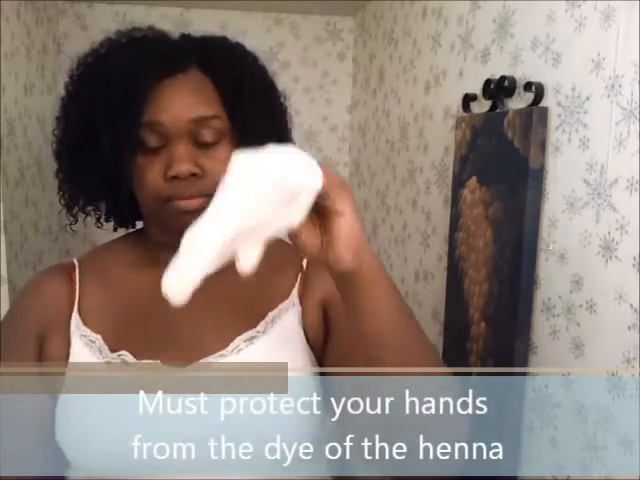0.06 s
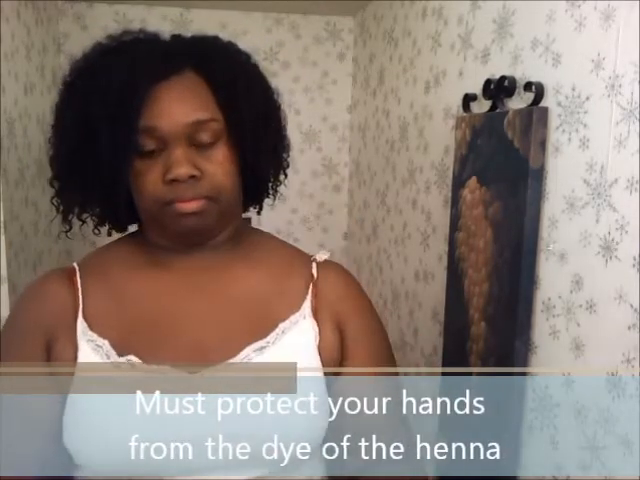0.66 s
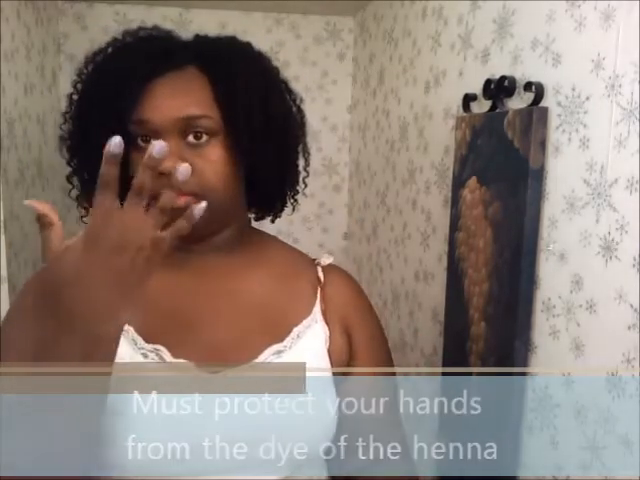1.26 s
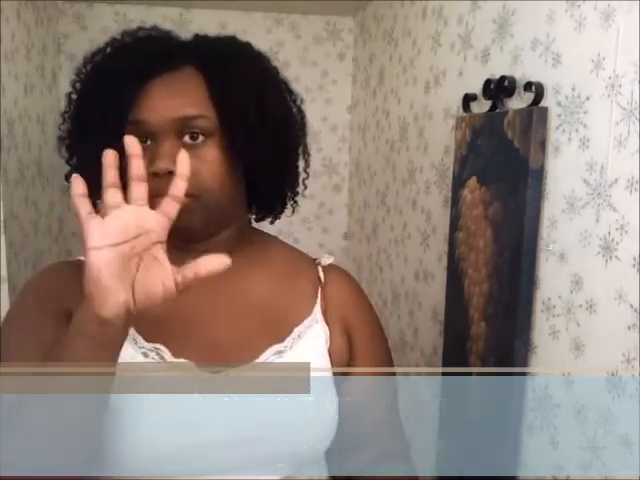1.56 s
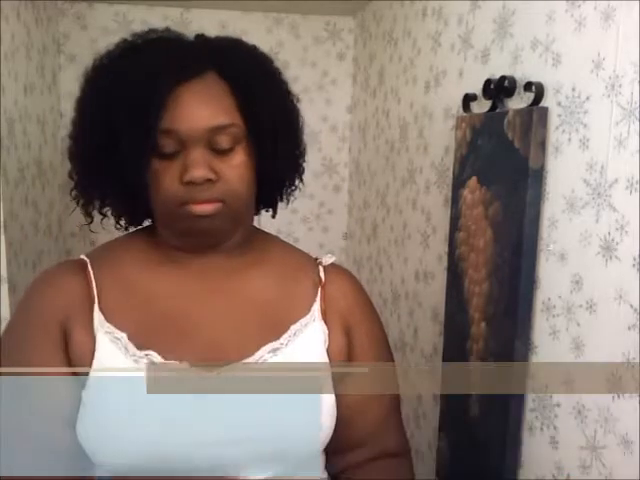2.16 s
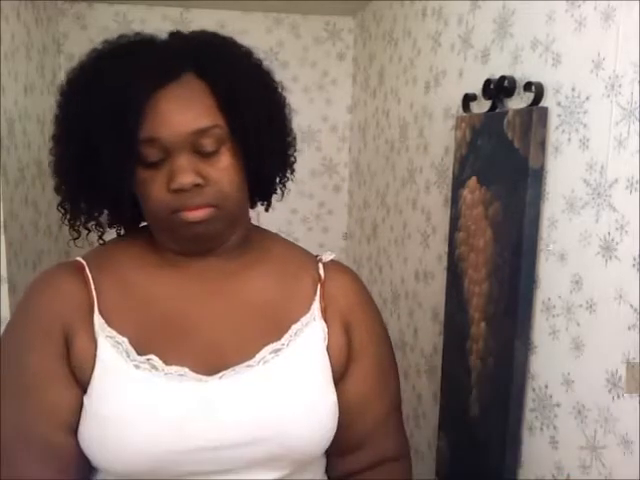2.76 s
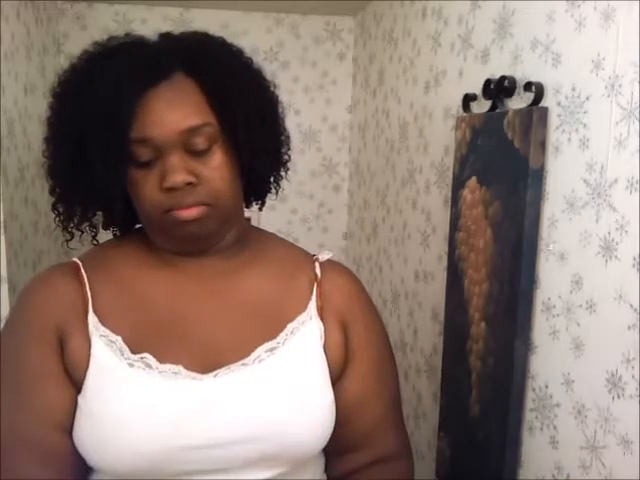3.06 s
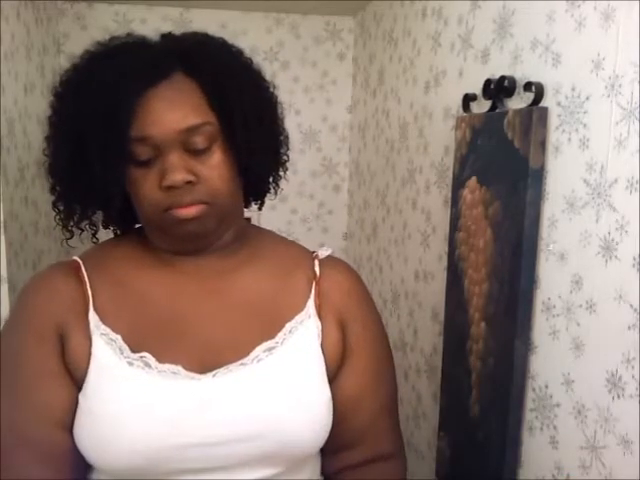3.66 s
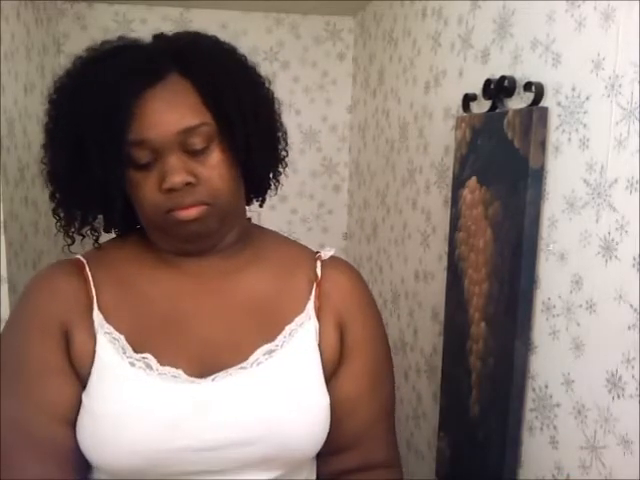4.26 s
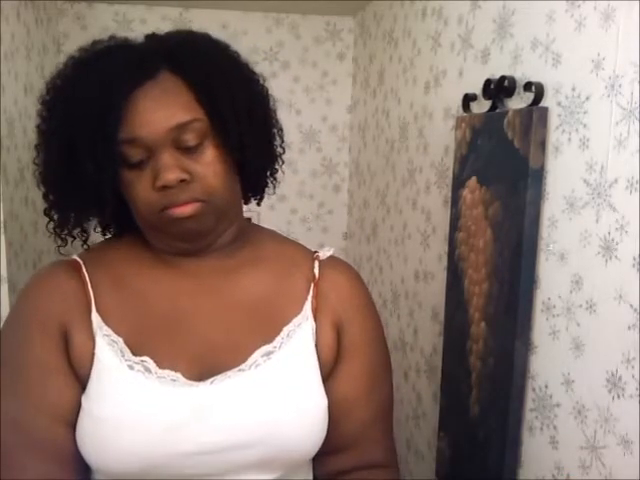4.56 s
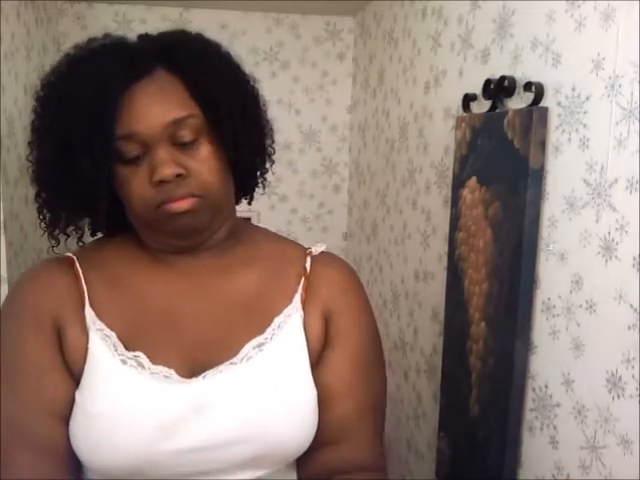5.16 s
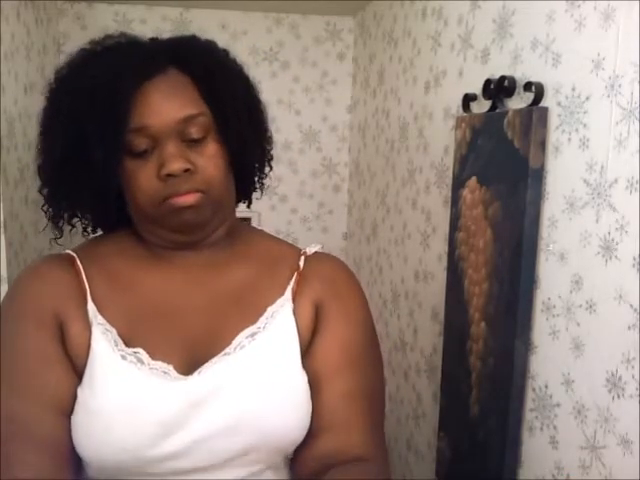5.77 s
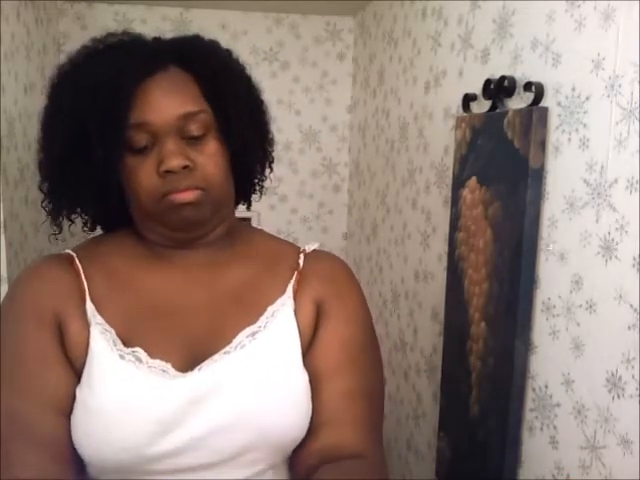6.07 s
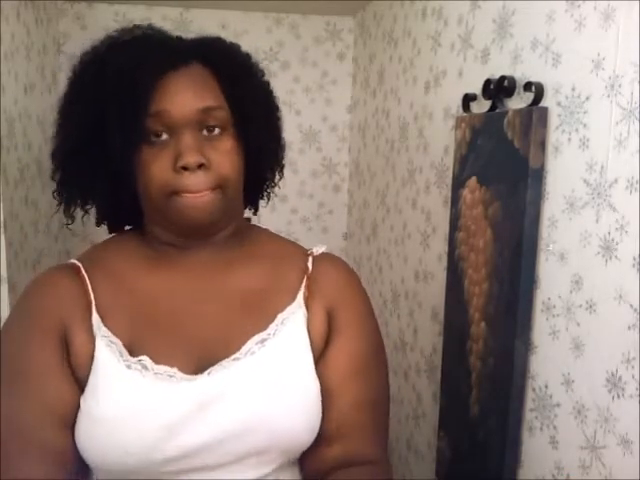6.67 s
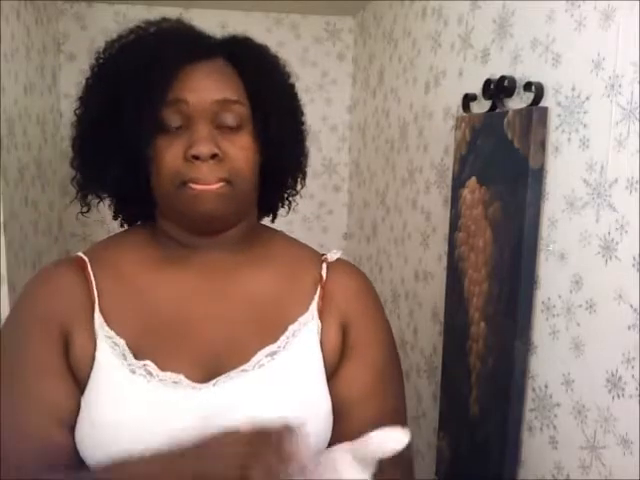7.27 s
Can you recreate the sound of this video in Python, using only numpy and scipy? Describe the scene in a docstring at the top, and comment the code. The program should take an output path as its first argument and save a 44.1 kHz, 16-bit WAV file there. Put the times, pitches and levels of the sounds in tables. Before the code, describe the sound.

Crinkling and sharp little snaps of a plastic glove being tugged on, with a faint hiss and hum behind.

```python
"""A thin plastic glove is pulled onto a hand in a small bathroom.
Stick-slip friction makes the film crackle as it slides, crumples and peels off the skin, while the
hand rubs inside it. Stretched and let go, the film snaps back with a crack, a slap and a soft thud.
The walls add reflections, a short reverberant tail and one standing wave.
A low hiss and a mains hum lie under it."""
import sys
import numpy as np
from scipy import signal
from scipy.fft import rfft, irfft
from scipy.io import wavfile
from scipy.ndimage import uniform_filter1d

SR = 44100
rng = np.random.default_rng(int(sys.argv[2]) if len(sys.argv) > 2 else 0)


def to_wav(sig):
    """Store sig (one row per channel, or 1-D mono) as 16-bit WAV at the path in sys.argv[1].

    Samples outside -1..1 are clipped; the rate is SR.
    """
    pcm = np.clip(np.atleast_2d(sig), -1, 1) * 32767
    pcm = np.round(pcm).astype(np.int16)
    wavfile.write(sys.argv[1], SR, pcm.T)  # frames by channels


N = 322371

# spectrum of the hiss: (frequency [Hz], relative level [dB])
HISS_SPECTRUM = [(15, -65), (25, -62), (48, -13.5), (120, -3.5), (149, -5.5), (242, -9), (285, -7.5),
                 (416, -9.5), (545, -13.5), (641, -12.5), (1890, -18), (2840, -19.5), (5280, -23),
                 (9840, -22), (16000, -23.5)]
# partials of the mains hum: (frequency [Hz], peak level [dB])
HUM_PARTIALS = [(62, -66), (120, -62.5), (238, -68)]
# reverberation time of the bathroom: (frequency [Hz], time to decay by 60 dB [s])
ROOM_T60 = [(250, 0.52), (700, 0.36), (2000, 0.33), (6000, 0.28), (14000, 0.2)]

# spectra of the glove's five sounds, each: (frequency [Hz], relative level [dB])
SLIDE_SPECTRUM = [(1650, -39), (2800, -9.5), (3600, -6), (4600, -3), (6300, -0.5), (7000, -2.5),
                  (8300, -11), (11000, -21.5), (14500, -16), (16000, -32)]
FOLD_SPECTRUM = [(470, -36), (800, -10.5), (1050, -6.5), (1500, -3), (2000, -2.5), (2800, -5.5),
                 (3600, -10), (4700, -13), (8000, -71.5)]
HAND_SPECTRUM = [(60, -72), (120, -35), (180, -13), (240, 1), (320, -5), (420, -3.5), (580, -1.5),
                 (720, -5), (950, -6.5), (1240, -16), (2100, -95)]
PEEL_SPECTRUM = [(5000, -22), (8000, 1), (11000, 2), (14500, -5), (16000, -18)]
CRACK_SPECTRUM = [(1650, -63), (2800, -9), (3700, -7.5), (4800, 2.5), (7000, -0.5), (8200, -6), (11000, -6),
                  (13500, -10), (16000, -14)]
# how hard the hands work between pulls, used relative to its mean: (time [s], level [dB])
EFFORT = [(0.0, -62.5), (0.43, -57), (1.51, -63), (2.36, -55), (2.46, -51.5), (2.97, -60), (3.3, -53),
          (3.46, -47), (3.6, -55), (3.93, -51.5), (4.66, -49.5), (4.91, -48), (5.5, -54), (5.94, -53),
          (6.13, -64), (6.8, -53.5), (6.94, -59.5), (7.31, -57)]
# short slides of the film as the fingers pull; the last three levels are relative to the sliding:
# (time [s], half length [s], sliding [dB], crumpling [dB], rubbing [dB], peeling [dB])
PULLS = [ (0.01, 0.028, -55.5, -3, -12, -13.5), (0.137, 0.014, -68.5, -2, 13.5, -10),
         (0.558, 0.032, -58, 0, 5.5, -17), (1.95, .035, -55, -3, -1, -11), (2.335, .03, -55, -12, -8, -16),
         (2.421, 0.011, -38.5, -5.5, -9, -13), (2.49, 0.047, -57, -12, 2.5, -16),
         (2.565, 0.046, -51, -6.5, -7.5, -14), (2.959, 0.018, -41.5, -8, -10, -16),
         (3.303, 0.016, -45, -4, -13, -16), (3.377, .035, -50, -14, -10, -9),
         (3.681, 0.024, -40, -12, -20.5, -6.5), (3.72, .02, -43, -4.5, -18, -5),
         (3.877, 0.016, -42.5, -1.5, -12, -13), (3.93, 0.048, -55.5, 5, 0.5, -22),
         (4.13, 0.058, -55.5, 1, -5, -7), (4.238, 0.028, -46, 1, -2.5, -8), (4.3, 0.0029, -48.5, 18, 7, 2),
         (4.528, 0.016, -44.5, -3, -1.5, -7), (4.732, 0.033, -51, 1.5, 4, -4),
         (4.786, 0.021, -43, 3, -2.5, -5), (4.86, .04, -45, -8, -8, -11),
         (4.967, 0.025, -38.5, -3, -4, -9.5), (5.107, 0.014, -43.5, -3, -20, -26),
         (5.203, 0.037, -47, -11, -9.5, -12), (5.347, 0.016, -52, 4, -4, -11),
         (5.466, .035, -45, -9, -11.5, -17), (5.626, 0.028, -52.5, -1, -14, -13),
         (5.782, 0.027, -44.5, -9.5, -14, -16), (5.97, 0.038, -51.5, -31, -21, -0.5),
         (6.281, 0.017, -55.5, -17, -5, -16), (6.418, 0.037, -53, -10, -15, -9),
         (6.782, 0.02, -43, -8, -40, -8.5), ]
# releases of the stretched film; slap and thud are relative to the crack: (time [s], crack energy [dB],
# slap [dB], thud [dB], crack frequency [Hz], slap frequency [Hz], sharpness [dB])
SNAPS = [ (2.406, -8, -12.5, -21, 6400, 1600, -10), (2.9459, -12, -12, -22, 5760, 2000, -7),
         (3.257, -18.5, -10, -22, 6540, 2490, 11), (3.4129, -8, -11, -15.5, 6400, 2440, 2),
         (3.506, 0.5, -10, -28, 6000, 2200, 4), (3.516, 9.5, -6.5, -16.5, 6450, 1880, 4),
         (3.664, -13.5, -19, -28, 4900, 2100, 13), (3.7181, -14.5, -7.5, -19, 6100, 1876, 9),
         (4.2964, -4.5, 4.5, -7, 4900, 1550, 3.5), (4.5351, 2.5, -1.5, -18.5, 4270, 2100, -1),
         (5.183, -23.5, 10, -7, 5000, 2400, -11), (5.3307, -17, -13, -24, 5700, 2600, -10),
         (5.3702, -17, 0, -5.5, 4360, 2180, -10), (5.509, -18, -20, -8, 5200, 2100, -6),
         (5.7807, -22.5, -3, -12, 5300, 2200, -3), (5.8131, -6, -17, -27, 6340, 2170, 7),
         (6.0022, -1.5, -14.5, -20, 6400, 1890, 4.5), (6.01, -4, -21, -24, 6060, 1900, -12),
         (6.1904, -23, -25, -19, 6560, 2185, 6), (6.41, -23, -15, -13, 6400, 2200, 2),
         (6.7665, -11, -16, -30, 6400, 2000, 3), (7.1162, -19, -20, -18, 5900, 1410, -17), ]

HISS_DB, CUTOFF_HZ = -56, 16000
ROOM_MODE_HZ = 271.4  # a standing wave between the walls
# each friction: level at mean effort [dB], slope [dB per dB of effort]
SLIDE_DB, SLIDE_SLOPE = -57.5, 1.23
CRUMPLE_DB, CRUMPLE_SLOPE = -64.5, 1.16
RUB_DB, RUB_SLOPE = -66.5, 0.63
PEEL_DB, PEEL_SLOPE = -72, 1.4
# a tighter film cracks higher; the thud falls THUD_DROP_OCTAVES for each octave that the crack falls
TIGHT_CRACK_HZ, TIGHT_THUD_HZ, THUD_DROP_OCTAVES = 6400, 580, 2.36


def from_db(db):
    """Amplitude ratio of a level: a factor of ten per 20 dB."""
    return 10 ** (np.asarray(db) / 20)


def unit_rms(x):
    """Power normalisation: the mean square becomes 1."""
    return x / np.sqrt(np.mean(x ** 2) + 1e-20)


def unit_energy(x):
    """Energy normalisation: the squares sum to 1."""
    return x / np.sqrt(np.sum(x ** 2) + 1e-20)


def at_hz(table, hz):
    """Linear interpolation of a table on a log-frequency axis."""
    table_hz, values = np.transpose(table)
    return np.interp(np.log(np.maximum(hz, 1)), np.log(table_hz), values)


def drift(knots_per_s):
    """Slow random modulation: straight lines between Gaussian values, rms 1."""
    knots = rng.standard_normal(N // 20)
    return unit_rms(np.interp(np.arange(N) / SR * knots_per_s, np.arange(len(knots)), knots))


def minimum_phase(spectrum, size=2048):
    """Folding the cepstrum gives a spectrum its causal impulse response, here of unit energy."""
    magnitude = from_db(at_hz(spectrum, np.fft.rfftfreq(size, 1 / SR)))
    cepstrum = irfft(np.log(magnitude))
    cepstrum[1:size // 2] *= 2
    cepstrum[size // 2 + 1:] = 0
    return unit_energy(irfft(np.exp(rfft(cepstrum))))


def convolve(x, impulse_response):
    """Linear filtering by convolution, cut to the length of x."""
    return signal.fftconvolve(x, impulse_response)[:len(x)]


def resonate(x, hz, width_hz, lift_db):
    """A damped second-order resonance lifts one band of x, or cuts it if the lift is negative."""
    radius = np.exp(-np.pi * width_hz / SR)
    numerator = np.array([1, 0, -1]) * (1 - radius ** 2) / 2
    denominator = [1, -2 * radius * np.cos(2 * np.pi * hz / SR), radius ** 2]
    return x + (from_db(lift_db) - 1) * signal.lfilter(numerator, denominator, x)


def hiss():
    """Stationary noise: white noise weighted by a spectrum that is strongest in the bass."""
    magnitude = from_db(at_hz(HISS_SPECTRUM, np.fft.rfftfreq(N, 1 / SR)))
    return from_db(HISS_DB) * unit_rms(irfft(rfft(rng.standard_normal(N)) * magnitude, N))


def mains_hum():
    """A sum of low sinusoids, each wavering by slow phase modulation."""
    t = np.arange(N) / SR
    return sum(from_db(db) * np.sin(2 * np.pi * hz * t + 0.83 * drift(7.8)) for hz, db in HUM_PARTIALS)


def bathroom(x, tail_db=3.0, early_db=0.0, early_s=0.02, gap_s=0.0017, reflections_per_s=2500):
    """Reverberation: direct sound, early reflections and a diffuse tail that dies sooner in the treble."""
    t = np.arange(SR // 2) / SR
    hz = np.fft.rfftfreq(len(t), 1 / SR)
    diffuse = np.exp(2j * np.pi * rng.random(len(hz)))  # flat spectrum, random phases
    edges_hz = [0, 350, 700, 1400, 2800, 5000, 8000, 12000, SR // 2 + 1]
    tail = 0
    for low, high in zip(edges_hz, edges_hz[1:]):
        band = irfft(diffuse * (hz >= low) * (hz < high), len(t))
        t60 = at_hz(ROOM_T60, (low + high) / 2)
        tail = tail + band * np.exp(-np.log(1000) * t / t60)
    arrivals = rng.random(len(t)) < reflections_per_s / SR
    early = arrivals * (rng.random(len(t)) - .5) * np.exp(-t / early_s)
    after_gap = t > gap_s
    room = from_db(tail_db) * unit_energy(tail * after_gap)
    room += from_db(early_db) * unit_energy(early * after_gap)
    room[0] = 1  # direct sound
    return convolve(x, unit_energy(room))


def from_many_spots(x, count=6, block=256):
    """A distributed source: crinkles start all over the glove, and each spot has its own echoes."""
    spot = np.repeat(rng.integers(0, count, N // block + 1), block)[:N]
    shares = [uniform_filter1d((spot == k) * 1.0, size=64) for k in range(count)]
    return sum(bathroom(x * share) for share in shares)


def friction(spectrum, slips_per_s, spread_db, smooth_db, creases_per_s, crease_db):
    """Stick-slip friction: clumps of tiny clicks over a smooth rub, with creases that flip; rms 1."""
    slips = rng.random(N) < slips_per_s * from_db(4 * drift(70)) / SR
    signs = rng.choice([-1, 1], N)
    sizes = from_db(spread_db * np.minimum(rng.exponential(1, N), 4))
    creases = (rng.random(N) < creases_per_s / SR) * rng.random(N)
    clicks = signs * (unit_rms(slips * sizes) + from_db(crease_db) * unit_rms(creases))
    smooth = from_db(smooth_db) * rng.standard_normal(N)
    return unit_rms(convolve(clicks + smooth, minimum_phase(spectrum)))


def friction_gains():
    """Incoherent sounds add in power: each friction follows the effort, and each pull adds a swell."""
    t = np.arange(N) / SR
    effort_db = np.interp(t, *np.transpose(EFFORT))
    effort_db -= effort_db.mean()
    laws = [(SLIDE_DB, SLIDE_SLOPE), (CRUMPLE_DB, CRUMPLE_SLOPE),
            (RUB_DB, RUB_SLOPE), (PEEL_DB, PEEL_SLOPE)]
    power = np.array([from_db(db + slope * effort_db) ** 2 for db, slope in laws])
    for time_s, half_length_s, slide_db, *relative_db in PULLS:
        gains = from_db(slide_db) * np.append(1, from_db(relative_db))
        swell = np.exp(-((t - time_s) / half_length_s) ** 2)
        power += np.outer(gains ** 2, swell)
    return np.sqrt(power)


def glove_rustle():
    """Four frictions superpose: the film slides, crumples and peels while the hand rubs inside it."""
    slide, crumple, rub, peel = friction_gains()
    sliding = slide * friction(SLIDE_SPECTRUM, slips_per_s=1100, spread_db=3.0, smooth_db=0.5,
                               creases_per_s=63, crease_db=1)
    crumpling = crumple * friction(FOLD_SPECTRUM, slips_per_s=700, spread_db=4.0, smooth_db=-9.5,
                                   creases_per_s=60, crease_db=-11)
    rubbing = rub * friction(HAND_SPECTRUM, slips_per_s=500, spread_db=2.5, smooth_db=-1.5,
                             creases_per_s=30, crease_db=-6.0)
    peeling = peel * friction(PEEL_SPECTRUM, slips_per_s=730, spread_db=3.5, smooth_db=-8,
                              creases_per_s=60, crease_db=0)
    return sliding + crumpling + rubbing + peeling


def impact(spectrum, flutter_s, flutter_db, size=2048):
    """Impulsive excitation: one click and the film's flutter, which dies within milliseconds."""
    age = np.arange(size) / SR / flutter_s
    burst = rfft(rng.standard_normal(size) * age * np.exp(-age))
    # the film spreads the blow in time but feeds all frequencies about equally
    flutter = irfft(burst / (np.abs(burst) + 1e-12))
    excitation = unit_energy(flutter * np.exp(-(age / 10) ** 2))
    excitation[0] += from_db(-flutter_db)  # the click; flutter_db is relative to it
    return convolve(excitation, minimum_phase(spectrum))


def glove_snaps(size=SR // 2):
    """Released tension: the film cracks, slaps the skin and thuds on the hand, each snap at a new spot."""
    out = np.zeros(N + size)
    for time_s, crack_db, slap_db, thud_db, crack_hz, slap_hz, sharpness_db in SNAPS:
        slack_octaves = np.log2(TIGHT_CRACK_HZ / crack_hz)
        thud_hz = TIGHT_THUD_HZ / 2 ** (THUD_DROP_OCTAVES * slack_octaves)
        crack = impact(CRACK_SPECTRUM, flutter_s=0.0003, flutter_db=5.5)
        slap = impact(FOLD_SPECTRUM, flutter_s=0.00057, flutter_db=0.5)
        thud = impact(HAND_SPECTRUM, flutter_s=0.0018, flutter_db=-37)
        # the film is heavily damped, so its resonances are broad
        crack = resonate(crack, crack_hz, width_hz=1700, lift_db=6.5)
        crack = unit_energy(resonate(crack, 12500, width_hz=6000, lift_db=sharpness_db))
        slap = unit_energy(resonate(slap, slap_hz, width_hz=900, lift_db=8))
        thud = unit_energy(resonate(thud, thud_hz, width_hz=180, lift_db=11))
        snap = crack + from_db(slap_db) * slap + from_db(thud_db) * thud
        start = int(time_s * SR)
        out[start:start + size] += from_db(crack_db) * bathroom(np.pad(snap, (0, size - len(snap))))
    return out[:N]


def scene():
    """Superposition of the glove, coloured by a room mode, with hiss and hum; both channels alike."""
    glove = from_many_spots(glove_rustle()) + glove_snaps()
    glove = resonate(glove, ROOM_MODE_HZ, width_hz=16, lift_db=6)
    mono = glove + hiss() + mains_hum()
    return np.array([mono, mono])


def record(dry):
    """Band limiting: an elliptic low-pass filter cuts the top steeply."""
    return signal.sosfilt(signal.ellip(10, .1, 70, CUTOFF_HZ, fs=SR, output="sos"), dry)


dry = scene()
out = record(dry)
to_wav(out)
```